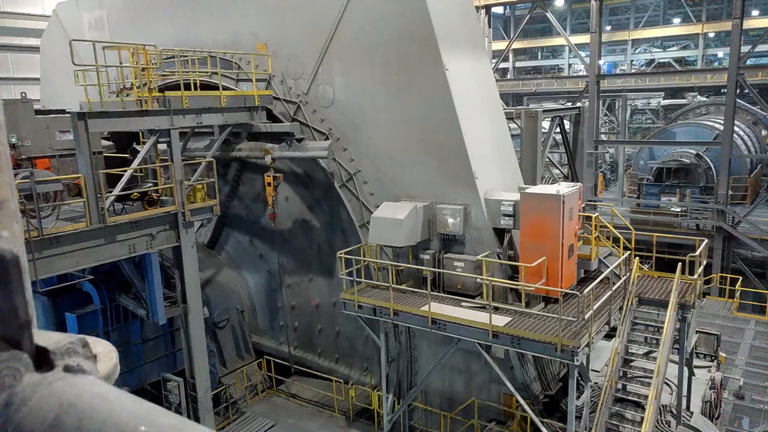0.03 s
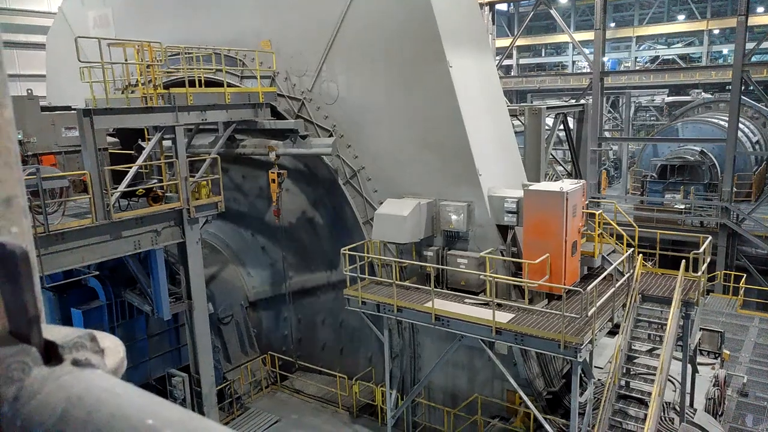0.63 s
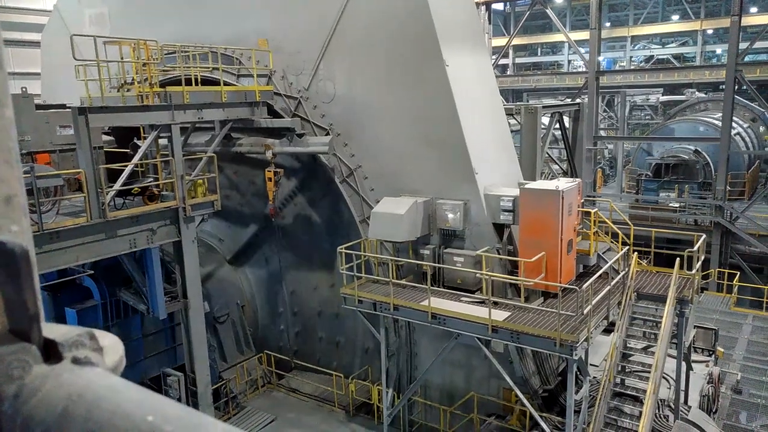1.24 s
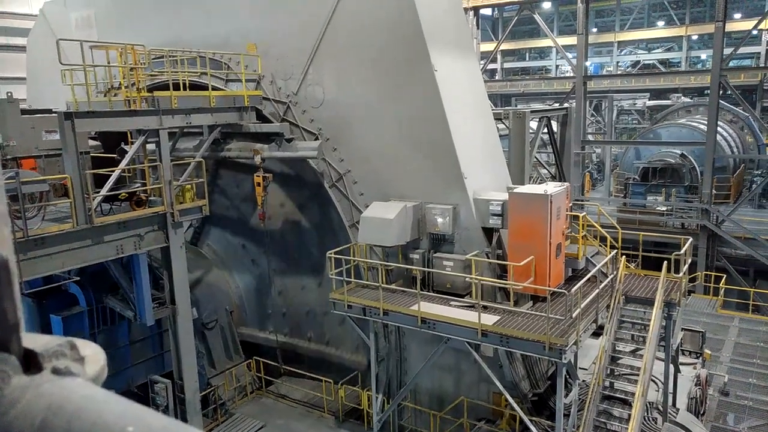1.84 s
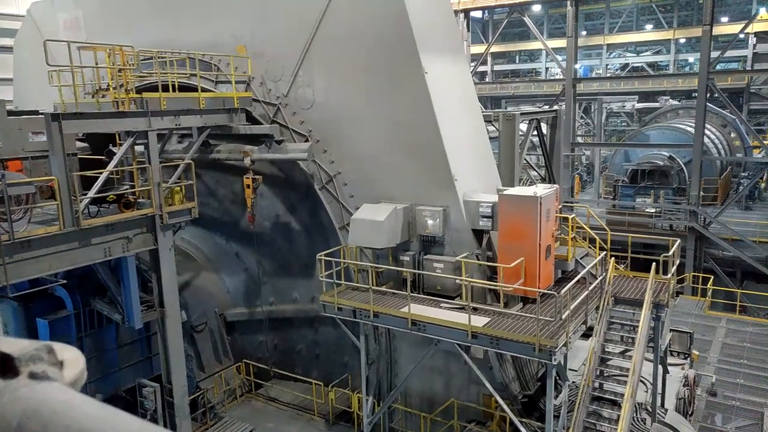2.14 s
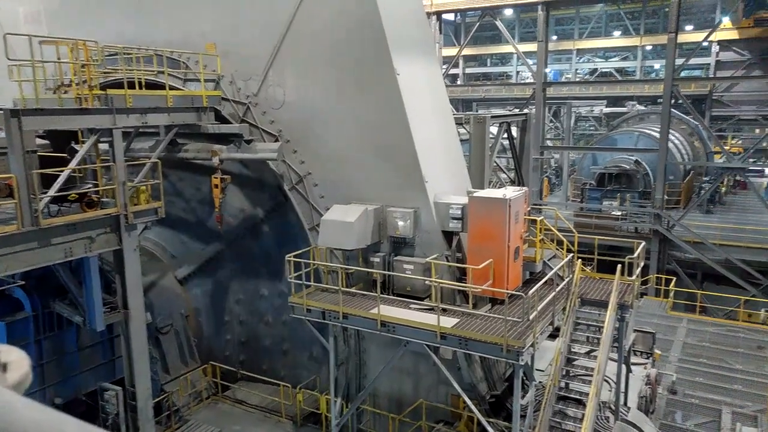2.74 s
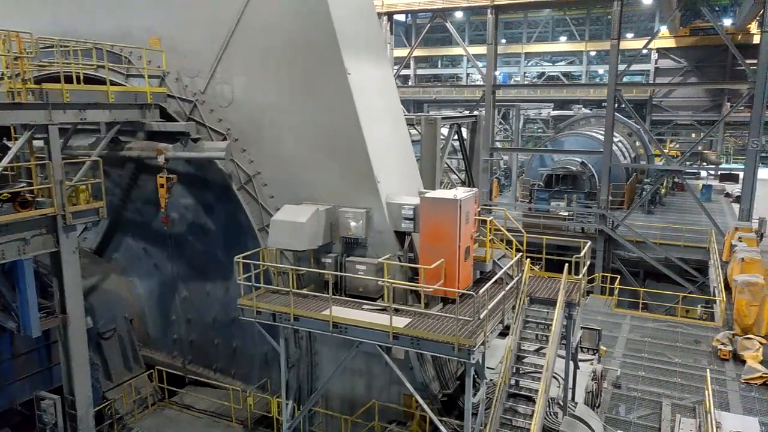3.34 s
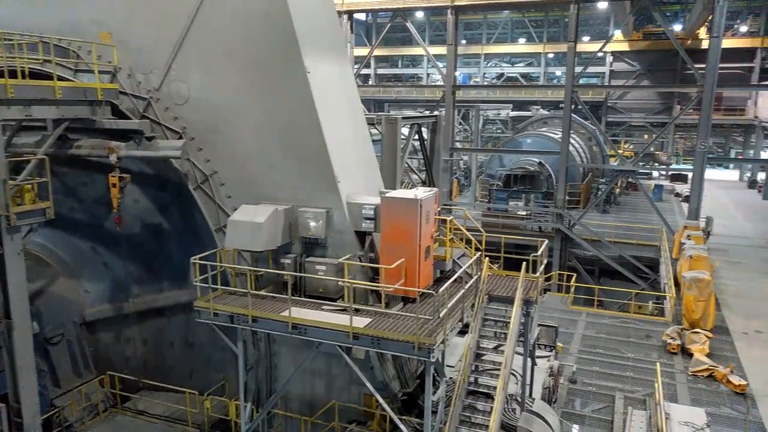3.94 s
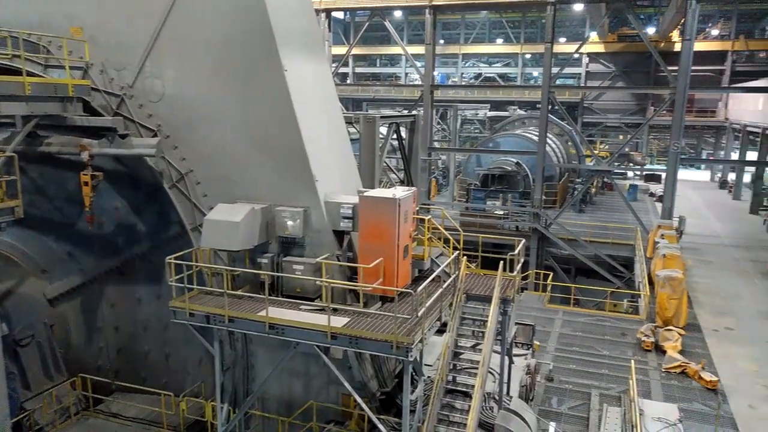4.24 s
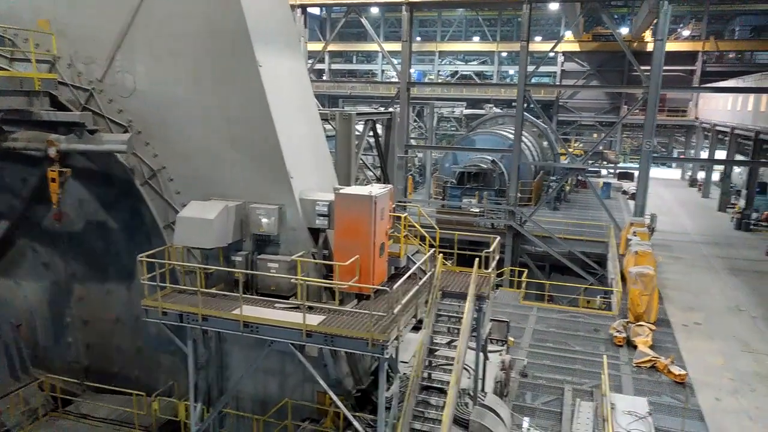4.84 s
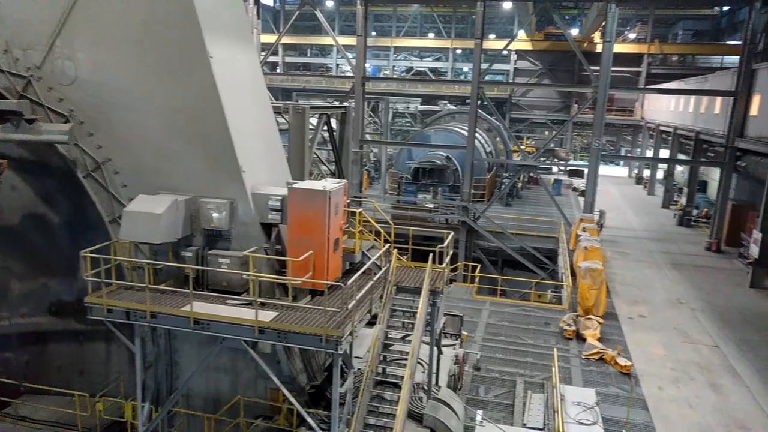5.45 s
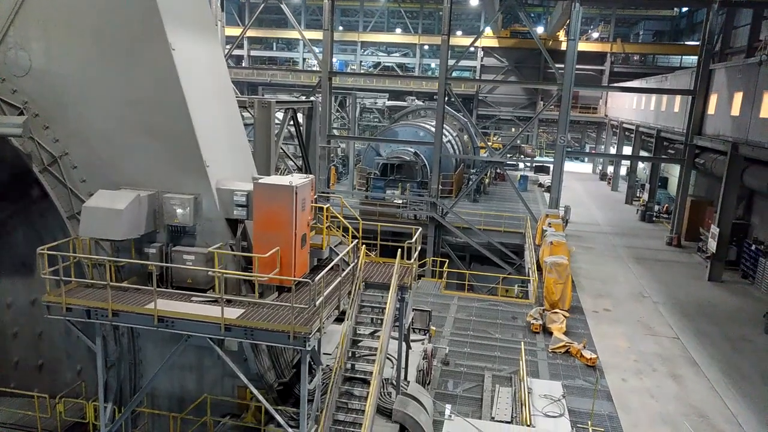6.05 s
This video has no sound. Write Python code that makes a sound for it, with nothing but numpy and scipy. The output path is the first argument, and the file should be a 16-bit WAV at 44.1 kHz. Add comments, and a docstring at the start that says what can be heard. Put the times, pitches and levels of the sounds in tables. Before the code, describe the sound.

It is silent until about 0.6 seconds, when the roar of a large grinding mill fades in quickly, reaching full level by 0.9 seconds. A deep, booming rumble of tumbling ore dominates, swelling slightly around 1.9 and 3.5 seconds. Underneath, two drives hum and whine, their tones wavering and beating against each other. On top, rock and steel balls crash against the lining in a dense, continuous clatter, with brief surges and faint steel ringing near 1, 2, 2.6 to 3.3, 4 and 5.5 to 5.9 seconds. Wet ore adds a softer, fine rattling hiss toward the right. The low drone dips and swells briefly between 3.2 and 3.4 seconds. Everything blends into the wide, diffuse sound of a big steel hall, staying loud and nearly level until the end at about 6 seconds.

```python
"""A large grinding mill turns in a steel hall, its tumbling load rumbling through the shell.
Rock and steel balls crash on the liners (the plates inside) and make the steel ring,
while wet ore rattles and hisses on a screen to the right. Two drives hum and whine underneath,
their tones beating slowly against each other. After a short silence the sound fades in.
A fast gain control holds the total steady, so the clatter swells whenever the rumble sags."""
import sys
import numpy as np
from scipy import signal
from scipy.fft import rfft, irfft, next_fast_len
from scipy.io import wavfile
from scipy.ndimage import uniform_filter1d, map_coordinates

SR = 44100
rng = np.random.default_rng(int(sys.argv[2]) if len(sys.argv) > 2 else 0)


def put_to_file(sound):
    """Save the sound as 16-bit audio at rate SR, in the file named by the first command-line argument."""
    columns = np.atleast_2d(sound).T  # one column per channel
    safe = np.clip(columns, -1, 1)
    whole_steps = np.round(safe * 32767)
    wavfile.write(sys.argv[1], SR, whole_steps.astype(np.int16))


N = 273861

# How alike the hall sounds on both sides (1 same, -1 opposite): pitch_hz, likeness
HALL_LIKENESS = [(100, 0.9866), (300, 0.94), (520, 0.66), (760, 0.67), (1050, 0.15), (1400, -0.16),
                 (1750, -0.5), (2000, -0.33), (2500, 0.35), (3000, -0.05), (3800, -0.11), (4400, 0.16),
                 (5000, -0.034)]
# The treble comes mostly from the right: pitch_hz, left_minus_right_db
HALL_BALANCE = [(100, -1.7), (850, -2), (1300, -1.5), (2200, -0.92), (3100, -5), (4300, -10.5), (6000, -9),
                (8200, -9), (9400, 2.5), (11800, 0.08)]
# Tone colour of the booming shell: pitch_hz, level_db
SHELL_COLOUR = [(18, -22), (33, -22.5), (42, -22), (54, -6.5), (72, -1), (125, 2), (195, -2.5), (260, -3),
                (340, -7.5), (470, -14), (750, -18), (1500, -60), (3000, -86)]
# The shell's boom rising and falling: time_s, gain_db
BOOM_SWELLS = [(0.75, -2), (0.95, 1), (1.3, -1.5), (1.47, 2), (1.7, -2), (1.9, 5), (2.08, -3.5),
               (2.25, 1.5), (2.9, -1), (3.2, 2.43), (3.5, 3.5), (3.65, 2.5), (4.28, -3), (4.45, -1.3),
               (4.8, 0), (5.2, 1.5), (5.6, -2), (6.2, -0.5)]
# Swells and sags of the whole rumble: time_s, gain_db
RUMBLE_SWELLS = [(0.78, 0.92), (1.05, 1.2), (1.2, 0), (2.6, -0.2), (2.66, -1.62), (2.82, 0.8), (3.0, -1.5),
                 (3.08, 2), (3.24, -0.8), (3.34, 1.5), (4.02, -.8), (4.08, 0.7), (4.96, -1), (5.04, 1.43),
                 (5.52, -0.8), (5.58, 1), (5.68, -3), (5.76, -0.7), (6.18, -0.1)]
# Tones of two drives at slightly different speeds: pitch_hz, level_db, left_minus_right_db, wander_rad
DRIVE_TONES = [(60.24, -26.8, -3, .24), (64.4, -30, -1, .5), (178.5, -38.5, 4, .6), (299.3, -38, -2, .6),
               (388, -36.5, -5, .57), (715.4, -43, 0, .55), (718.5, -37.2, 0, .6), (1028.5, -45.3, -5, .5),
               (1431, -46.5, -2, .4), (1437, -45, -4, .3)]
# Swells and sags of the deep drone: time_s, gain_db
DRONE_SWELLS = [(0.7, -2), (1.05, -3.5), (1.33, 1), (1.62, -6), (1.72, 0), (2.1, 0.2), (2.26, -4.5),
                (2.36, 2.5), (2.68, -3), (2.87, -1), (3.0, -0.5), (3.08, 3.5), (3.25, -10.5), (3.4, 5),
                (3.52, 1), (3.6, -0.2), (4.8, 0.98), (4.92, 0), (5.03, 3), (5.2, -1), (5.45, -3.5),
                (5.6, 0), (5.72, 1.5), (5.86, 3), (6.15, -2)]
# Tone colour of the struck liners: pitch_hz, level_db
LINER_COLOUR = [(150, -20), (450, -2.5), (780, 0.5), (1080, -3.5), (1450, -4), (1800, -4), (2100, -5.5),
                (2430, -7.5), (2750, -10), (3100, -13.5), (4400, -19), (6500, -22.5), (8300, -28),
                (9600, -41), (11800, -47), (13000, -64.5)]
# Tone colour of wet ore on the screen: pitch_hz, level_db
SCREEN_COLOUR = [(500, -35), (2000, 3), (3000, 2), (4400, -2), (6500, -6.5), (8200, -12), (9000, -14),
                 (9700, -27), (13000, -46)]
# Brief surges of the clatter and steel ring: start_s, over_steady_crashing_db, ring_db
CLATTER_SURGES = [(1.0, 2.5, -9), (1.178, 2, -9), (1.63, -4, -6.5), (1.96, -0.5, -10), (2.038, -2, -2),
                  (2.255, 0.5, -4), (2.608, 0, -7), (2.668, -2, -7), (2.732, -2.5, -3), (2.892, 4.5, -4),
                  (2.968, 0, 2), (3.178, -3, 1), (3.228, 1.8, -3), (3.28, 0, -12), (3.955, -8, -1),
                  (4.008, 0, -11), (4.14, 2, -6), (4.908, -13.5, -6), (5.473, 0, -8), (5.638, -8, -9.5),
                  (5.688, 1, -9), (5.882, 2, -8), (5.935, 0, -8)]
# Swells of the crashing, rattle and ring together: time_s, gain_db
CLATTER_SWELLS = [(0.7, -1.5), (0.77, 0.5), (1.25, 0.7), (2.8, 0.1), (3.0, -0.8), (3.07, 0.2), (3.25, 0),
                  (3.45, 0.9), (4.1, 0.1), (5.1, 0.4), (5.55, 0.15), (6.2, 0.5)]
# The opening fade: time_s, gain_db
OPENING_FADE = [(0.589, -11), (0.605, -10), (0.68, -3.5), (0.705, -4.5), (0.725, -1), (0.8, 0), (0.9, 1)]


def amp(db):
    """Turn decibels into a number to multiply by."""
    return 10 ** (np.asarray(db) / 20)


def unit(x):
    """Scale a signal to an average power of 1."""
    return x / np.sqrt(np.mean(x ** 2) + 1e-20)


def running_db(pair, samples):
    """Level of both channels together over a sliding window."""
    return 10 * np.log10(np.abs(uniform_filter1d(np.mean(pair ** 2, axis=0), samples)) + 1e-12)


def at_pitch(rows, hz):
    """Read between (pitch_hz, value) rows, with octaves evenly spaced."""
    pitches, values = np.transpose(rows)
    return np.interp(np.log(hz + 1), np.log(pitches + 1), values)


def curve(rows):
    """Join (time_s, value) rows into one value per sample."""
    return np.interp(np.arange(N) / SR, *np.transpose(rows))


def wobble(per_s):
    """A smooth curve through per_s random points a second."""
    return map_coordinates(rng.standard_normal(int(N * per_s / SR) + 4), [np.arange(N) * per_s / SR])


def filtered(x, response):
    """Turn each frequency up or down by response(hz)."""
    size = next_fast_len(N + SR // 2)
    return irfft(rfft(x, size) * response(np.fft.rfftfreq(size, 1 / SR)), size)[..., :N]


def swell_band(x, swells, centre_hz, half_width_octaves):
    """Make one band of pitches rise and fall along (time_s, gain_db) rows."""
    band = filtered(x, lambda hz: 1 / (1 + (np.log2((hz + 1) / centre_hz) / half_width_octaves) ** 4))
    return x + (amp(curve(swells)) - 1) * band


def in_hall(noises, colour):
    """Colour two noises and spread them left and right, as the hall scatters sound."""
    def blend(hz):
        angle = np.arccos(np.clip(at_pitch(HALL_LIKENESS, hz), -1, 1)) / 2
        return amp(at_pitch(colour, hz)) * [np.cos(angle), np.sin(angle)]
    mid, side = filtered(noises, blend)
    pair = np.array([mid + side, mid - side])
    return unit(filtered(pair, lambda hz: amp(np.outer([.5, -.5], at_pitch(HALL_BALANCE, hz)))))


def tumbling_load(base_db, lurch_db):
    """Rolling ore booms through the heavy shell, with quick random lurches on top of slower swells."""
    shell = in_hall(rng.standard_normal((2, N)), SHELL_COLOUR)
    boom = swell_band(shell, BOOM_SWELLS, centre_hz=219, half_width_octaves=0.67)
    evened = boom / amp(running_db(boom, samples=3000))
    return amp(base_db + curve(RUMBLE_SWELLS) + lurch_db * wobble(per_s=14)) * evened


def drives(flutter_db):
    """Motors hum and gears whine, made unsteady by the many paths through the hall."""
    t, hum = np.arange(N) / SR, np.zeros((2, N))
    for hz, db, pan_db, wander_rad in DRIVE_TONES:
        tone = np.sin(2 * np.pi * hz * t + wander_rad * wobble(per_s=2.97))
        fluttering = unit(tone * amp(flutter_db * wobble(per_s=4.21)))
        hum += amp(db + np.array([[.5], [-.5]]) * pan_db) * fluttering
    return hum


def impacts(per_s, spread_db, decay_s):
    """Power of random blows, averaging 1; each dies away by 60 dB in decay_s."""
    hits = rng.random(N) < per_s / SR
    sizes = hits * amp(spread_db * np.clip(rng.standard_normal(N), -2, 2))
    kept_per_sample = np.exp(-np.log(10 ** 6) / (decay_s * SR))
    power = signal.lfilter([1], [1, -kept_per_sample], sizes ** 2)
    return power / power.mean()


def patchy_noise(depth_db):
    """Two separate noises whose colour shifts in the same random patches."""
    spectra = signal.stft(rng.standard_normal((2, N)), nperseg=512)[2]
    patches = uniform_filter1d(rng.standard_normal(spectra.shape[1:]), size=9, axis=0)  # across pitch
    patches = uniform_filter1d(patches, size=10, axis=1)  # across time
    return unit(signal.istft(spectra * amp(depth_db * unit(patches)), nperseg=512)[1][:, :N])


def liner_crashes(base_db, wash_share):
    """Rock and balls hit the liners, each a short burst over the hall's even wash of noise."""
    blows = impacts(per_s=430, spread_db=1.5, decay_s=0.052)
    surges = clatter_surges([(s, db) for s, db, _ in CLATTER_SURGES], decay_s=0.111)
    power = wash_share + (1 - wash_share) * blows + surges
    return amp(base_db) * in_hall(np.sqrt(power) * patchy_noise(depth_db=0.04), LINER_COLOUR)


def wet_ore(base_db, pan_db):
    """Small stones and watery mud rattle on the screen as dense ticks."""
    ticks = impacts(per_s=2000, spread_db=3.5, decay_s=0.035)
    rattle = in_hall(np.sqrt(ticks) * patchy_noise(depth_db=1.17), SCREEN_COLOUR)
    return amp(base_db + np.array([[.5], [-.5]]) * pan_db) * rattle


def steel_ring(base_db, small_blows_db, pitch_hz, width_hz, decay_s):
    """Steel rings at many close pitches: faintly under small blows, more clearly in brief surges."""
    surges = clatter_surges([(s, ring_db) for s, _, ring_db in CLATTER_SURGES], decay_s)
    power = amp(small_blows_db) ** 2 * impacts(per_s=37, spread_db=0, decay_s=decay_s) + surges
    noise = in_hall(rng.standard_normal((2, N)), LINER_COLOUR)
    ring = filtered(noise, lambda hz: 1 / (1 + ((hz - pitch_hz) / width_hz * 2) ** 2))
    return amp(base_db) * np.sqrt(power) * unit(ring)


def clatter_surges(surges, decay_s, rise_s=0.0137):
    """Power of (start_s, level_db) surges: each builds quickly, then dies away."""
    power = np.zeros(N)
    for start_s, db in surges:
        age_s = np.maximum(np.arange(N) / SR - start_s, 0)
        faded_db = 60 * np.maximum(age_s - rise_s, 0) / decay_s
        power += amp(db - faded_db) ** 2 * np.minimum(age_s / rise_s, 1)
    return power


def scene():
    """The mill's rumble and drives, with crashing, rattle and ring on top."""
    roar = tumbling_load(base_db=-15.5, lurch_db=0.65) + drives(flutter_db=3.0)
    roar = swell_band(roar, DRONE_SWELLS, centre_hz=63, half_width_octaves=0.794)
    clatter = liner_crashes(base_db=-22.0, wash_share=0.73)
    clatter += wet_ore(base_db=-35.5, pan_db=-3.5)
    clatter += steel_ring(base_db=-35.5, small_blows_db=-9.0, pitch_hz=2397, width_hz=140, decay_s=.3)
    return roar + amp(curve(CLATTER_SWELLS)) * clatter


def gain_control(x, threshold_db, strength, boost_db):
    """Quickly take back most of every swell above the threshold."""
    over_db = np.maximum(running_db(x, samples=700) - threshold_db, 0)
    return x * amp(boost_db - strength * uniform_filter1d(over_db, size=500))


def record(dry):
    """Hold the level steady, fade in quickly after silence and cut off the highest treble."""
    silence_s, top_hz = .589, 13200
    held = gain_control(dry, threshold_db=-16, strength=.73, boost_db=1.72)
    opening = amp(curve(OPENING_FADE)) * (np.arange(N) / SR >= silence_s)
    return filtered(held * opening, lambda hz: hz < top_hz)


dry = scene()
out = record(dry)
put_to_file(out)
```